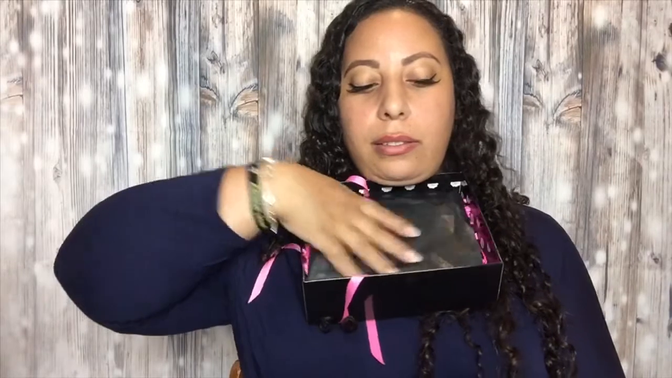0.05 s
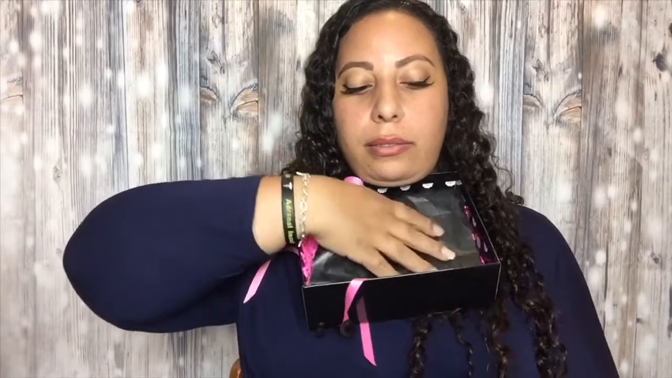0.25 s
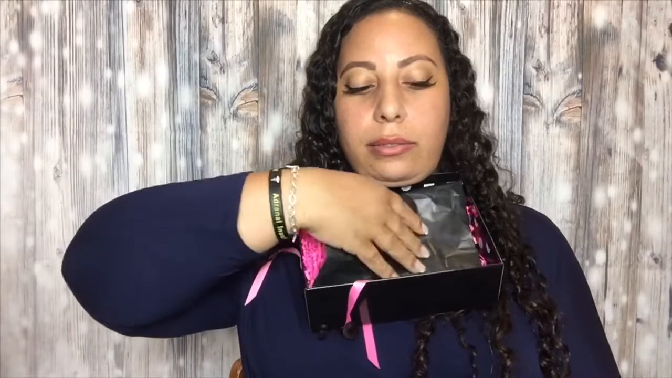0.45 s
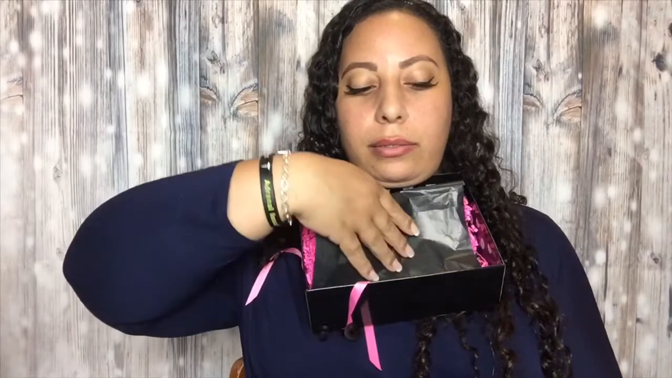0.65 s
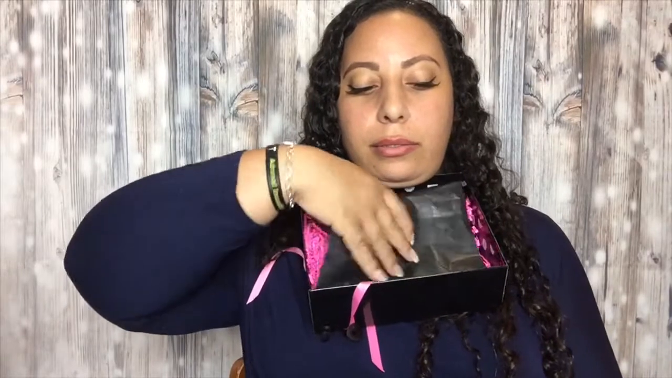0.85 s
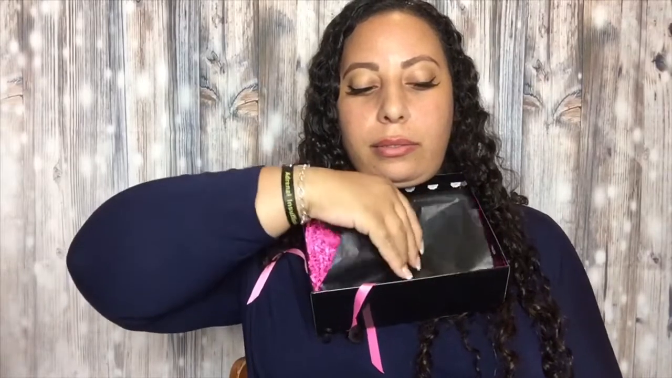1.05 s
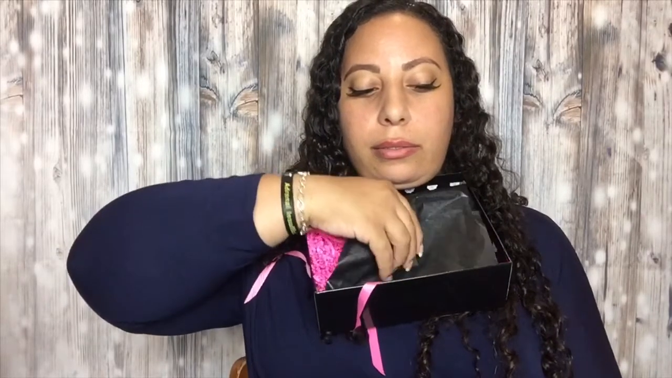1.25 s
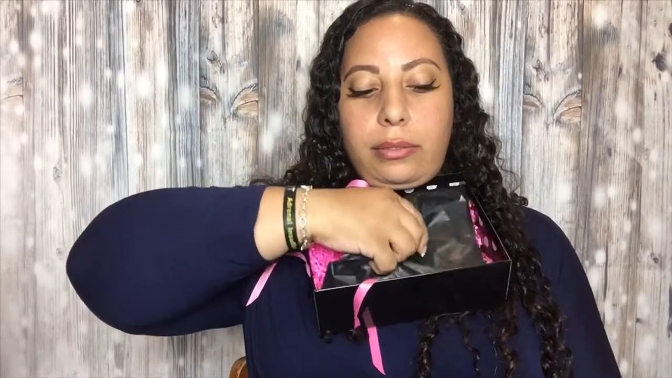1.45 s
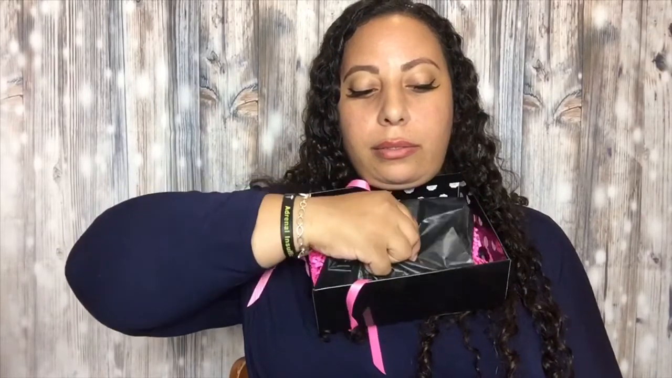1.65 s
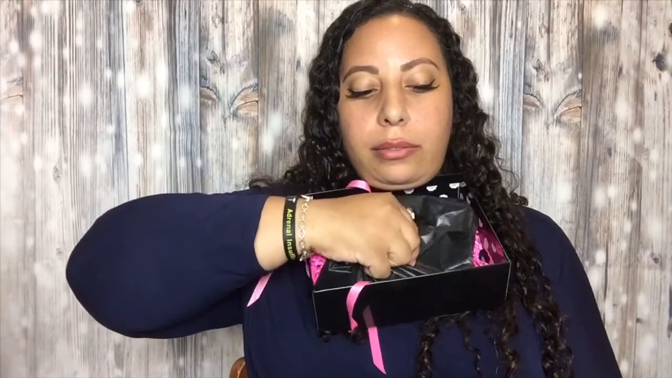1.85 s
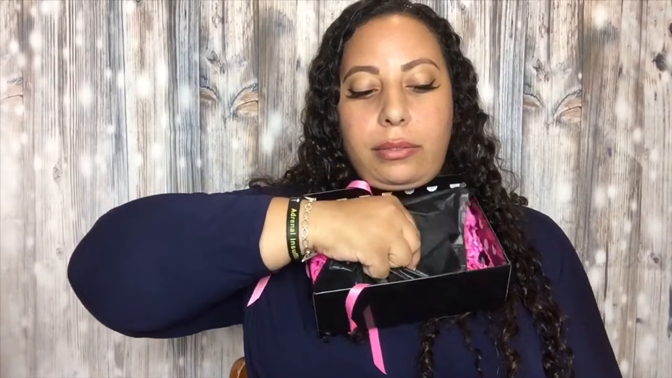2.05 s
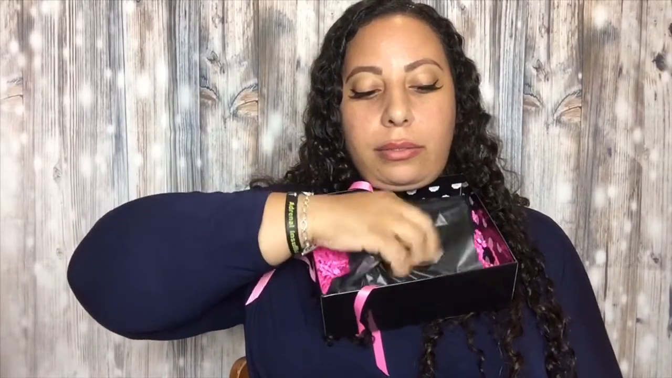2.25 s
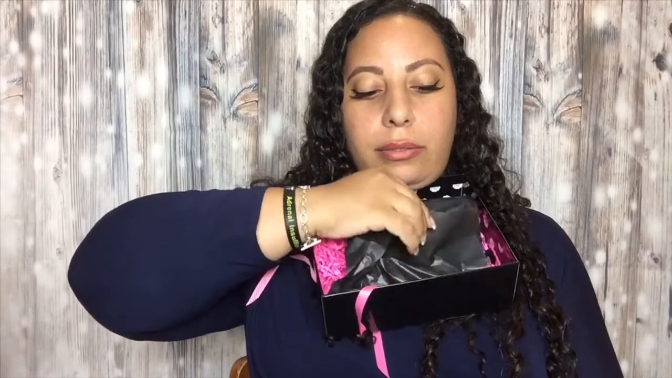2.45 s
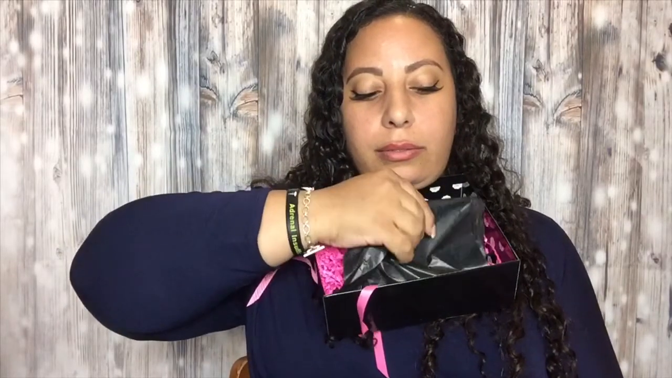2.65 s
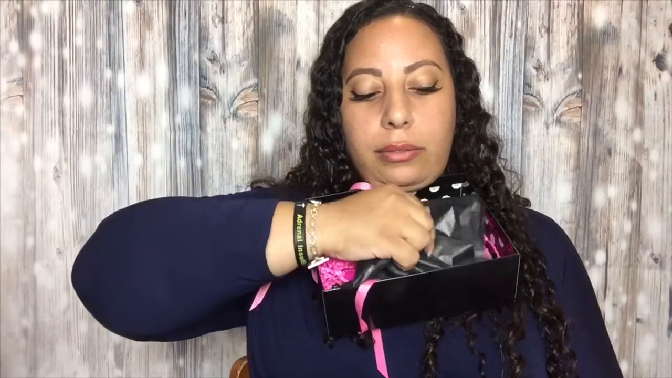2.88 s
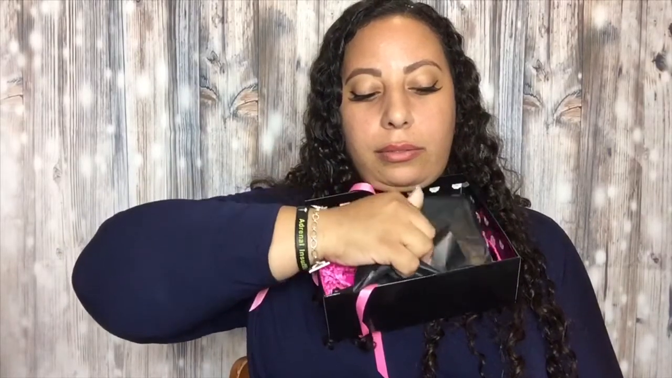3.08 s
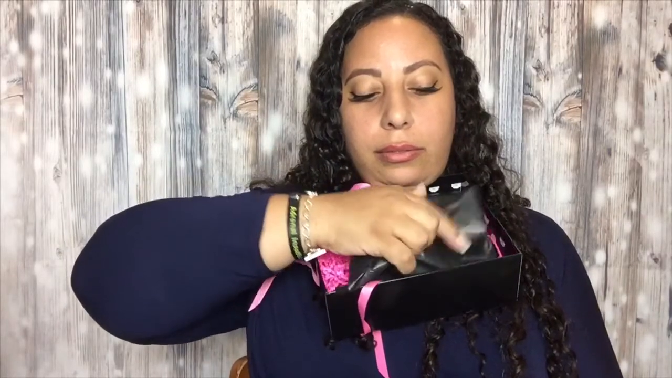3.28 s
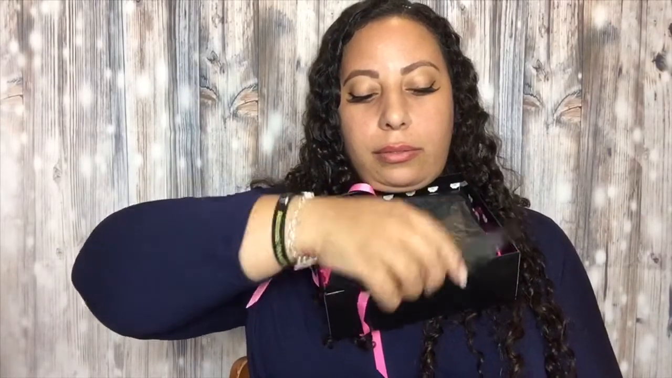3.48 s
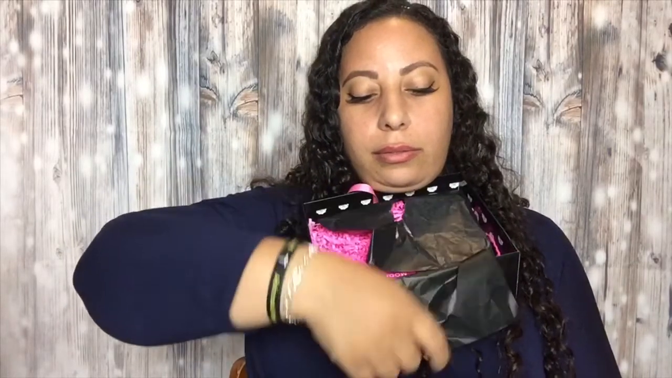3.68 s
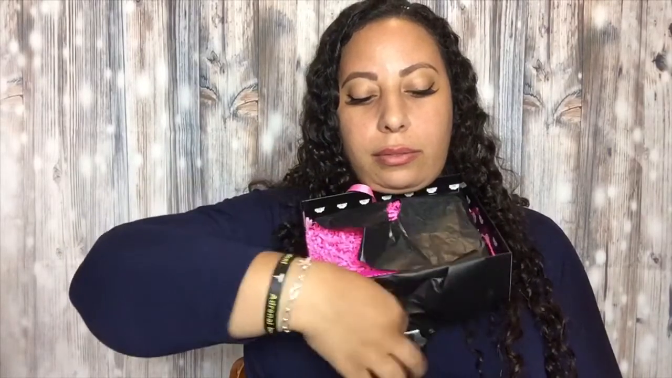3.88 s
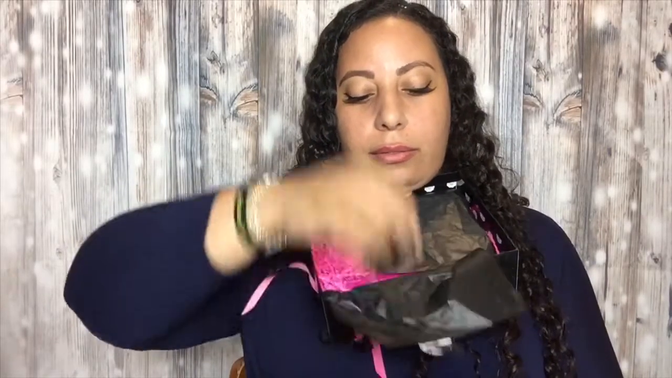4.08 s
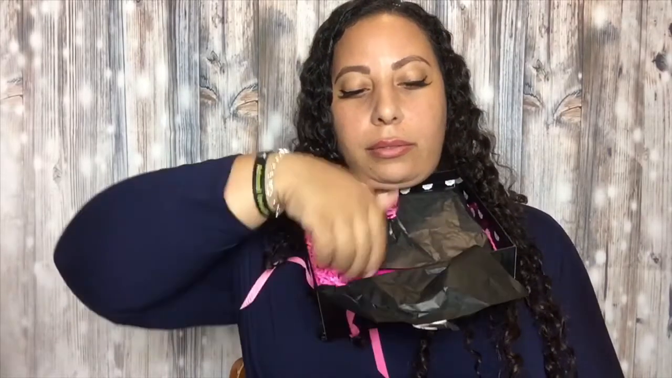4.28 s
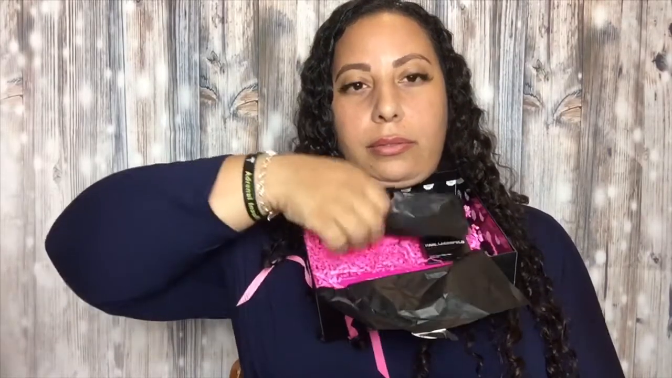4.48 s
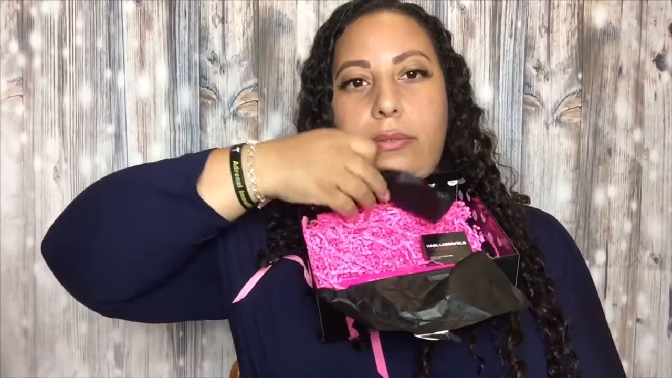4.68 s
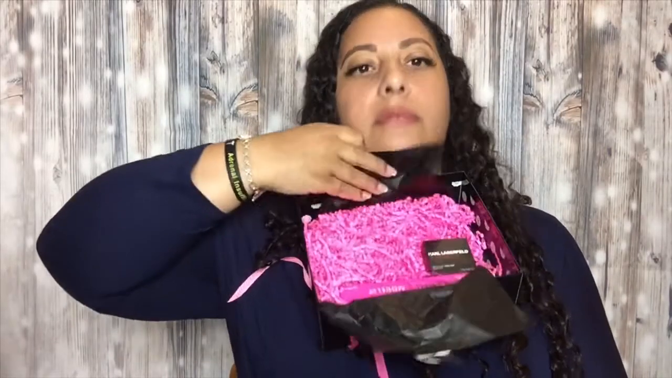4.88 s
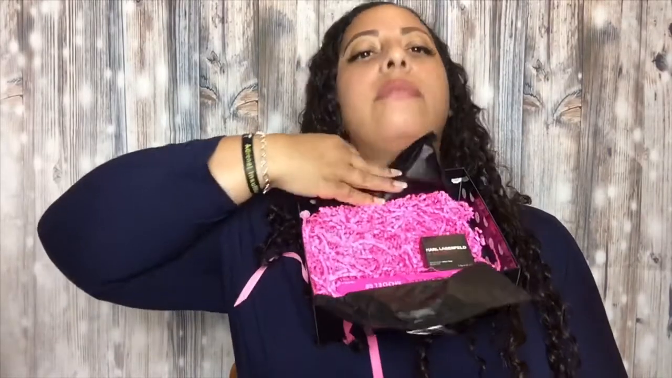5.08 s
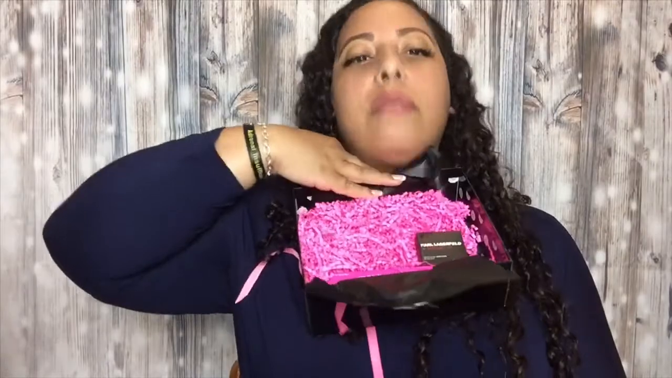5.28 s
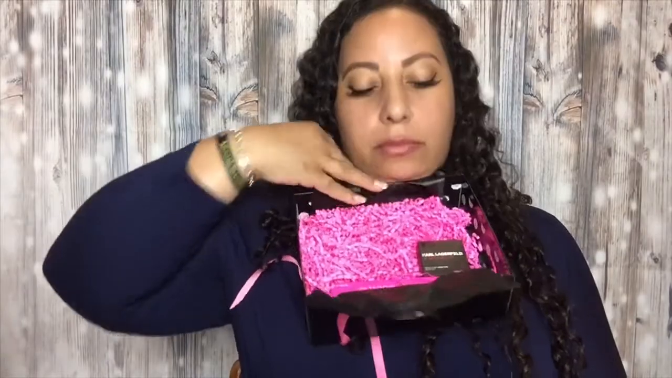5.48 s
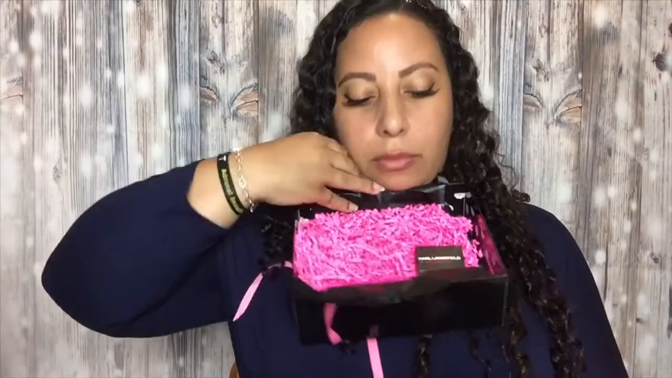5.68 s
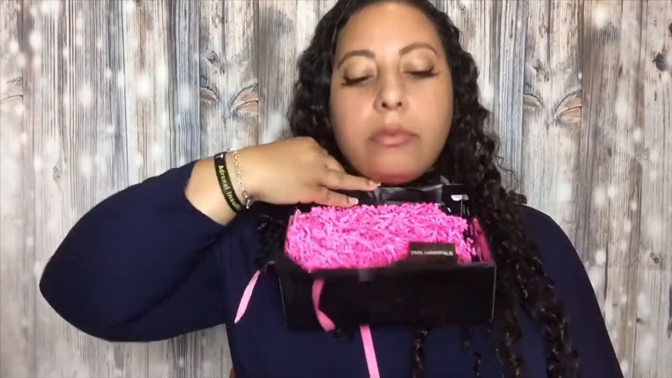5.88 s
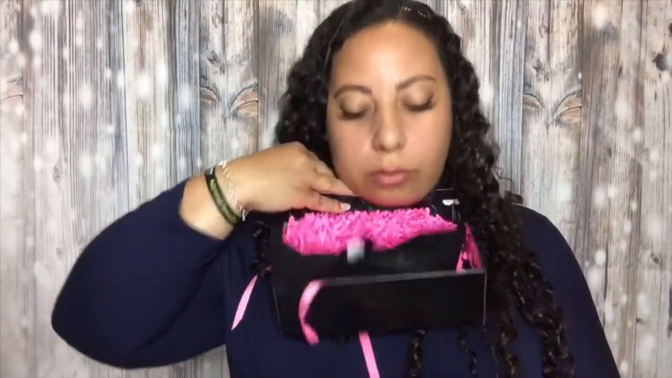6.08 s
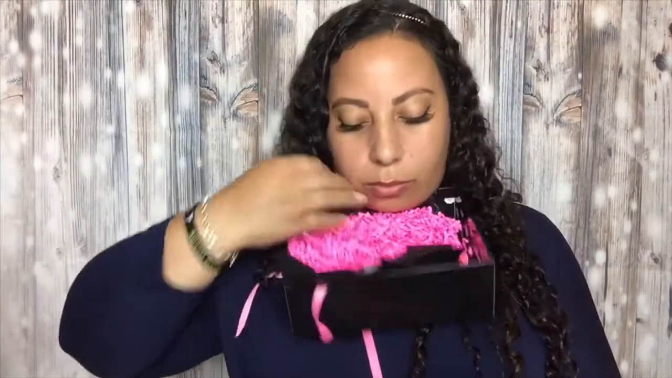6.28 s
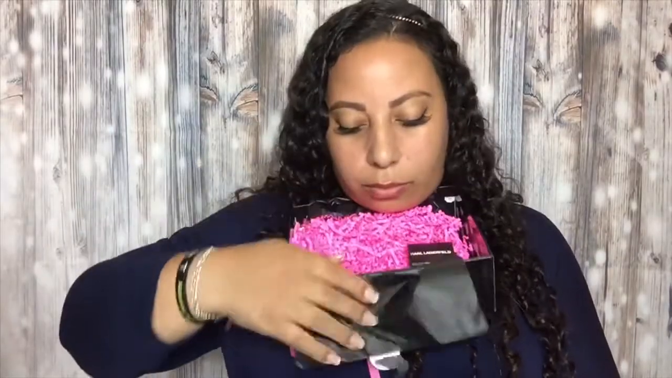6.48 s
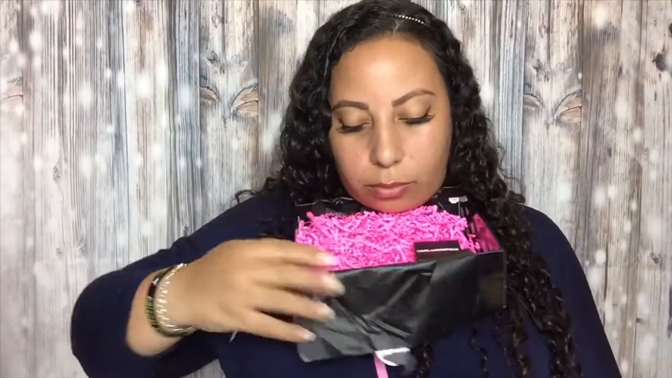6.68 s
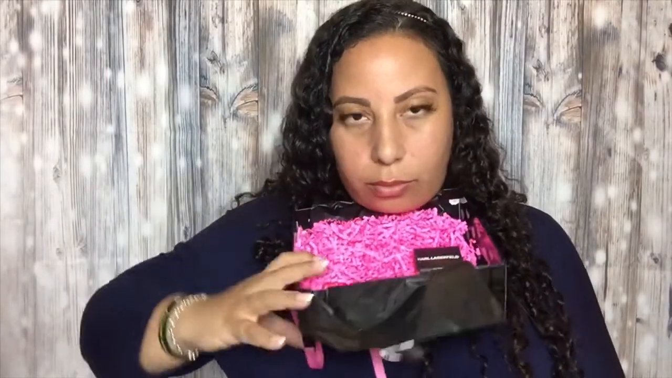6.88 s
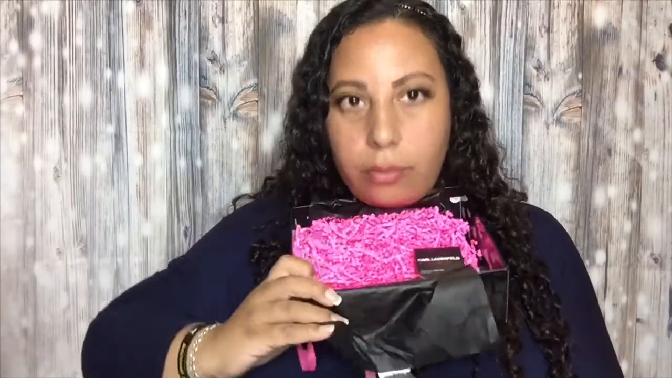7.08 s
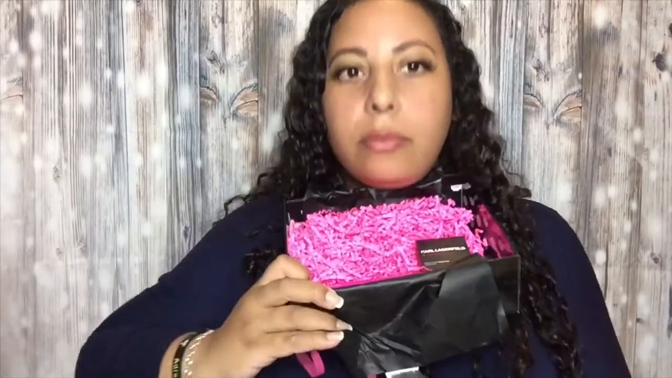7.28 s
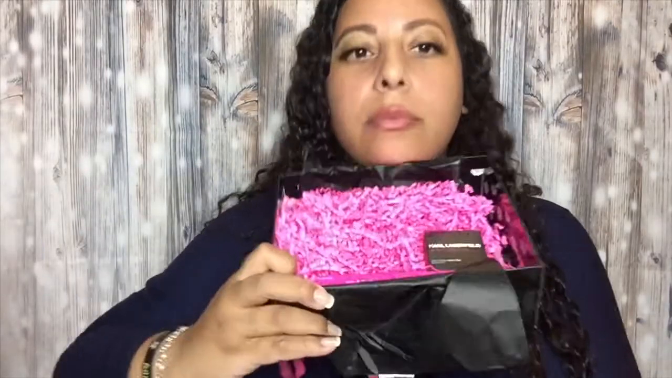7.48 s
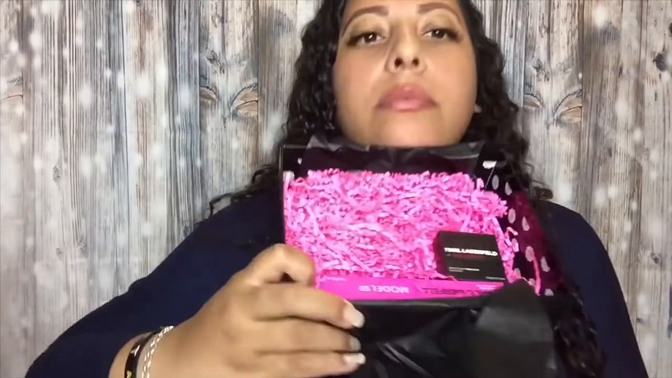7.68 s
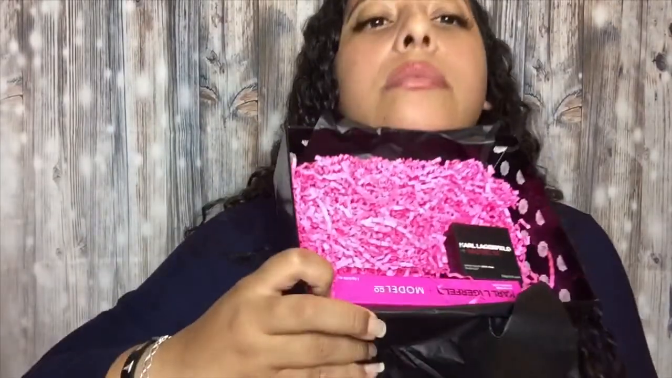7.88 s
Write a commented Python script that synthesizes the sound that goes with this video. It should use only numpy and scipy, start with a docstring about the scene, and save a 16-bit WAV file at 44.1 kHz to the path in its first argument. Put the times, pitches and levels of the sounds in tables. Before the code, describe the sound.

Thin tissue paper is handled inside a cardboard box, close to the microphone in a quiet room with faint steady air noise. From the start it rustles in uneven bursts, fine crackles and sharp crease snaps over a dry sliding hiss. The crinkling grows fuller from about 1.4 seconds, with a loud crunch just after 2 seconds and more crumpling around 2.7 to 3.1. The box adds a slight hollow ring and a few soft, damped knocks. The paper eases off and almost stops between 4.1 and 4.4 seconds. A light knock and a dense run of crisp crinkling follow, strongest from 4.9 to 5.4. Lighter crackles continue, with another sharp burst around 6.4 to 6.6. After a quieter stretch near 7 seconds, a few short rustles and a small tap on the box at 7.6 fade out by 8 seconds.

```python
"""In a quiet room, close to a microphone, a hand folds thin tissue paper back out of a cardboard box.
Creases buckle and release their elastic energy: large ones as short snaps, tiny ones as a swarm of
crackles over the friction hiss of the sliding sheet. Resonances of the box add a hollow ring, and
knocks on its walls give a few damped thuds. The paper's sound reflects briefly over steady air noise."""
import sys
import numpy as np
from scipy import signal
from scipy.fft import rfft, irfft
from scipy.io import wavfile
from scipy.ndimage import uniform_filter1d

SR = 44100
rng = np.random.default_rng(int(sys.argv[2]) if len(sys.argv) > 2 else 0)


def master(y):
    """Save y as 16-bit WAV."""
    cut = np.clip(np.atleast_2d(y).T, -1, 1)
    pcm = np.round(cut * 32767)  # scale
    wavfile.write(sys.argv[1], SR, pcm.astype(np.int16))


N = 350154

# Bands of the sheet's spectrum. Each row: lower edge in Hz, upper edge in Hz, group
# (0 paper body, 1 crisp edge, 2 box hollow, 3 box boom).
BANDS = [(120, 450, 3), (450, 1000, 2), (1000, 1800, 0), (1800, 3000, 0), (3000, 5000, 0), (5000, 8000, 1),
         (8000, 11000, 1), (11000, 17000, 1)]


def gain_of(db):
    """Amplitude ratio of a level in decibels; doubling the level gives the power ratio."""
    return 10 ** (np.asarray(db) / 20)


def unit_rms(x):
    """Normalisation to a root-mean-square value of 1."""
    return x / np.sqrt(np.mean(x ** 2) + 1e-20)


def curve_at(points, hz):
    """Interpolation along a logarithmic frequency axis."""
    f, value = np.transpose(points)
    return np.interp(np.log(hz + 1), np.log(f + 1), value)


def resonances_db(rows, hz):
    """Resonance peaks or dips as a sum of Lorentzian curves in decibels."""
    return sum(db / (1 + (2 * (hz - f) / width) ** 2) for f, width, db in rows)


def room_tone(level_db=-66):
    """Stationary noise of the room's air, strongest in the bass."""
    # Air spectrum. Each row: frequency in Hz, relative spectral density in dB.
    air = [(20, -35.5), (45, 1.5), (90, -12), (170, -5), (400, -12), (1300, -10), (2300, -12), (5000, -15),
           (16000, -29)]
    hz = np.fft.rfftfreq(N, 1 / SR)
    spectrum = rfft(rng.standard_normal(N)) * gain_of(curve_at(air, hz))
    return gain_of(level_db) * unit_rms(irfft(spectrum, N))


def paper_bands():
    """Source and filter: noise coloured by sheet and box, split into bands, with unit power per group."""
    # Spectrum of the sheet. Each row: frequency in Hz, relative spectral density in dB.
    sheet = [(88, -57), (150, -27), (264, -23.5), (334, -23.5), (457, -13.5), (637, 3.5), (888, -4.5),
             (1600, 0), (3770, 0), (4950, -1.5), (6770, -5.5), (10200, -9.5), (12200, -5), (14500, -10),
             (16000, -16)]
    # Modes of the box's air and walls. Each row: centre in Hz, width in Hz, gain in dB.
    box_modes = [(336, 27, 12.5), (500, 64, 6.5), (791, 19, 7), (1290, 26, 6)]
    hz = np.fft.rfftfreq(N, 1 / SR)
    spectrum = rfft(rng.standard_normal(N)) * gain_of(curve_at(sheet, hz) + resonances_db(box_modes, hz))
    bands = np.array([irfft(spectrum * ((hz >= lo) & (hz < hi)), N) for lo, hi, _ in BANDS])
    groups = np.array([group for *_, group in BANDS])
    power = (bands ** 2).mean(1)
    return bands / np.sqrt([power[groups == group].sum() for group in groups])[:, None]


def hand_effort(t):
    """Driving level in dB: the hand's touch and its crumples are incoherent, so their powers add."""
    # The hand rests and drags on the sheet. Each row: time in seconds, level in dB.
    touch = [(0, -42), (.9, -40), (1.3, -43), (1.6, -39), (2.35, -40), (2.5, -49), (2.7, -42.5),
             (3.12, -40.5), (3.2, -49.5), (3.42, -49), (3.7, -44), (4.0, -49.5), (4.2, -69.5), (4.38, -75),
             (4.44, -44.5), (5.0, -34.5), (5.2, -36), (5.28, -46), (5.6, -49.5), (5.8, -44), (6.2, -48.5),
             (6.36, -58), (6.5, -44), (6.78, -52), (6.84, -67.5), (7.29, -60), (7.35, -45), (7.7, -53.5),
             (7.94, -70.5)]
    # Fingers crumple the sheet. Each row: start in seconds, length in seconds, level in dB.
    crumples = [(0.055, 0.036, -41), (0.111, .055, -37), (0.182, 0.15, -35), (0.375, 0.053, -39),
                (0.49, 0.14, -42), (0.646, 0.022, -43.5), (0.7, 0.018, -44), (0.779, 0.018, -40),
                (0.971, 0.14, -35), (1.247, 0.018, -39), (1.344, 0.09, -35), (1.47, .23, -33),
                (1.764, 0.017, -37), (1.868, 0.059, -35), (2.054, 0.037, -22), (2.201, 0.13, -37.5),
                (2.417, 0.041, -41.5), (2.619, 0.013, -40.5), (2.734, 0.067, -32.5), (2.833, 0.041, -35),
                (2.936, 0.057, -31), (3.072, 0.012, -28), (3.125, 0.015, -35.5), (3.456, 0.18, -36),
                (3.818, 0.075, -40), (3.972, 0.053, -50), (4.1, 0.043, -60), (4.286, 0.044, -61),
                (4.405, .02, -45.5), (4.439, 0.068, -37), (4.653, 0.061, -40.5), (4.786, 0.14, -35.5),
                (5.0, 0.034, -35.5), (5.097, 0.048, -30.5), (5.348, 0.033, -36), (5.395, .12, -37.5),
                (5.641, 0.01, -41), (5.834, 0.024, -44.5), (6.121, 0.025, -41), (6.18, 0.023, -40),
                (6.42, 0.034, -30), (6.561, 0.036, -35), (6.846, 0.0069, -58.5), (7.081, 0.073, -43),
                (7.241, 0.025, -60), (7.414, 0.033, -44), (7.484, 0.025, -36.5), (7.588, 0.037, -49.5),
                (7.713, 0.093, -53)]
    rise_db_per_s, fall_db_per_s = 712.5, 371
    start, length, db = np.transpose(crumples)[:, :, None]
    coarse = t[::44]
    rise_db = rise_db_per_s * np.maximum(start - coarse, 0)
    fall_db = fall_db_per_s * np.maximum(coarse - start - length, 0)
    power = gain_of(2 * (db - rise_db - fall_db)).sum(0)
    power += gain_of(2 * np.interp(coarse, *np.transpose(touch)))
    return np.interp(t, coarse, 10 * np.log10(power))


def burst(t60, rise=0.03):
    """Power envelope of one crease, peak 1: exponential decay after a rise lasting a fraction of t60."""
    samples = max(t60, .002) * SR
    age = np.arange(int(samples)) / samples
    shape = (1 - np.exp(-(age / rise) ** 2)) * gain_of(-120 * age)
    return shape / shape.max()


def crackle_power(per_s=900, colour_db=7.0, clump_db=3.0, t60=0.018, slide=0.14):
    """Band powers of shot noise from tiny buckling creases, mixed with the hiss of sliding friction."""
    # How the sheet is held. Each row: time in seconds, then the levels of crisp edge, box hollow
    # and box boom in dB relative to the paper body.
    grip = [(0, -6, -11, -27), (1.06, -3, -9, -18.5), (2.0, -2.5, -7, -20.5), (2.6, -2, -10, -23.5),
            (2.85, -3, -9, -16), (3.55, -3, -10, -15.5), (3.95, -2, -14, -33), (4.24, -9, -15, -6),
            (4.5, -0.5, -9.5, -25), (4.8, -4.5, -16, -24.5), (5.4, -3, -17.5, -27), (5.9, -5, -20.5, -29),
            (6.4, -2, -11, -19.5), (6.7, -1.5, -16.5, -30), (7.0, -4.5, -13.5, -23),
            (7.4, -6.5, -17.5, -27), (7.9, -0.5, -9, -32)]
    t = np.arange(N) / SR
    grip_s, crisp_db, hollow_db, boom_db = np.transpose(grip)
    grip_db = (0 * grip_s, crisp_db, hollow_db, boom_db)
    effort_db = hand_effort(t)
    activity = np.clip(gain_of(.8 * (effort_db + 38)), .05, 1.5)  # a light touch: fewer creases
    onsets = np.flatnonzero(rng.random(N) < per_s / SR * activity)
    size_db = 4.0 * np.minimum(rng.exponential(1, N)[onsets], 3)
    colour = uniform_filter1d(rng.standard_normal((N, len(BANDS)))[onsets], size=2, axis=1)
    clumps = unit_rms(uniform_filter1d(rng.standard_normal(N), size=500))
    hiss_share = np.clip(slide * gain_of(0.38 * (effort_db + 33)), 0, .9)  # a firm hand slides more
    power = np.zeros((len(BANDS), N))
    for k, (lo, _, group) in enumerate(BANDS):
        power[k, onsets] = gain_of(2 * (size_db + colour_db * colour[:, k] + clump_db * clumps[onsets]))
        decay = burst(t60 * (0.53 + 800 / lo), rise=0.033)  # low bands ring longer
        grains = abs(signal.oaconvolve(power[k], decay)[:N])
        local_mean = uniform_filter1d(uniform_filter1d(grains, size=2600), size=2600)
        texture = hiss_share + (1 - hiss_share) * grains / abs(local_mean)
        level_db = effort_db + np.interp(t, grip_s, grip_db[group])  # the hand sets the energy spent
        power[k] = texture * gain_of(2 * level_db)
    return power


def snap_power(colour_db=2.5, crest_db=-13.5, focus_db=10.5, tilt_db=1.5, ring_s=0.0093, tick_s=0.0029):
    """Band powers of large creases buckling: a ring near the flap's pitch and a quick, bright tick."""
    # Snapping creases. Each row: start in seconds, level in dB, crisp edge in dB relative to
    # the paper body, flap pitch in Hz.
    snaps = [(0.0632, -5.5, -9, 3170), (0.1427, -3.5, -8, 2080), (0.258, -3.5, -11.5, 1520),
             (0.3206, -10.5, -5.5, 3080), (.411, -15.5, 1, 1420), (0.5425, -16, 0, 4610),
             (.585, -1.5, -9, 3670), (0.65, -5, -13, 2180), (0.7133, -6.5, -4.5, 1120),
             (0.781, -17, 7, 3500), (0.989, -23.5, 20.5, 3440), (1.027, -19, 11.5, 1650),
             (1.13, -12.5, 7.5, 3100), (1.2422, -7, -1, 3170), (1.3257, -12.5, -3, 2440),
             (1.35, -12.5, -1.5, 3960), (1.39, -7, 2.5, 1700), (1.49, -10, 4, 2450),
             (1.6927, 3.5, -9, 2760), (1.765, -14.5, -1, 2780), (1.868, -19, 5, 2450),
             (2.0048, -6.5, -14, 2100), (2.0441, -9, 1, 3160), (2.076, -4, 1.1, 2900),
             (2.4131, -17.5, 6.5, 3420), (2.4284, -14.5, 2, 1280), (2.5285, -26, 7, 2820),
             (2.552, -15, 2, 4420), (2.6216, -10.5, -2.5, 3430), (2.7664, -22, 6, 1210),
             (2.7871, -7.5, 7, 1850), (2.927, -9, 0, 1950), (3.0055, -13, 3, 1800),
             (3.0782, -6.5, -19, 2540), (3.2, -28, 6, 3500), (3.255, -23, 2, 2500), (3.2964, -20, -5, 2410),
             (3.663, -11.5, -5, 3970), (3.7027, -15.5, 3.5, 1620), (3.7685, -11.5, -4.5, 2160),
             (3.8412, -6.5, 0, 3240), (3.983, -15, 3, 2840), (4.07, -28, 2.5, 2870),
             (4.106, -25, -16, 3570), (4.301, -38, 14.5, 3440), (4.6055, -11.5, 2.5, 2000),
             (4.6967, -4, -10, 1600), (4.769, -7, -.6, 2020), (4.7912, -11.5, 8, 3220),
             (4.8678, -10, -3, 1950), (4.9016, -1.5, -6, 1350), (4.9873, -10.5, -3, 3680),
             (5.011, -3, -2.1, 2980), (5.09, -6, -15, 1620), (5.1091, 1.5, -7, 1590),
             (5.14, -1.5, -9, 1940), (5.1936, -7.5, -3, 2160), (5.224, -7, -0.5, 2390),
             (5.3082, -7, 1.5, 2180), (5.327, -6, -6, 3800), (5.3432, -2.5, -12, 1260),
             (5.3713, -6, 4.5, 3840), (5.4107, -4, 2.1, 2840), (5.4926, -11, -4, 4300),
             (5.564, -29.5, 6, 3000), (5.6083, -23, 0, 3940), (5.6481, -12.5, 1.5, 3500),
             (5.7055, -18, 5, 3540), (5.7332, -15.5, 8, 3470), (5.777, -21, -1, 3000),
             (5.8227, -21, 0, 2710), (5.844, -15, -1.1, 2960), (5.861, -21, 2, 3000), (5.91, -12, -4, 2880),
             (5.9608, -8, -4.5, 1290), (6.03, -19, -16, 2120), (6.0555, -15, -5, 2290),
             (6.0936, -15, 2, 2960), (6.116, -11.5, 0.5, 3950), (6.182, -11, -5, 3100),
             (6.1907, -20, 15.5, 4120), (6.207, -22, -2, 3500), (6.295, -28.5, 9, 3730),
             (6.4, -3, -5, 2200), (6.4036, -3.5, -2, 2060), (6.4487, -12.5, 3, 2640),
             (6.5121, -14.5, 7, 2700), (6.5747, -2, -3.5, 3270), (6.7152, -20, -6, 3360),
             (6.7422, -9, -37, 1220), (6.779, -33, -8, 4000), (6.79, -28, -1, 4000),
             (6.8518, -27, 0.5, 3520), (6.865, -22, -5, 3080), (6.933, -33, -8, 4000),
             (7.049, -26.5, -9, 2650), (7.0789, -16.5, 3.5, 3350), (7.1313, -32, 11.5, 2850),
             (7.2269, -22, -35, 2610), (7.24, -28, -20, 2000), (7.2567, -21.5, -8, 1560),
             (7.3839, -10, -8.5, 3080), (7.437, -18, -14, 3000), (7.4944, -15, 6.5, 4100),
             (7.5835, -8, -15, 4500), (7.748, -15.5, -17, 1440), (7.7634, -10.5, -2.5, 4150)]
    hollow_db, boom_db = -26.5, -40  # relative to the paper body
    power = np.zeros((len(BANDS), N))
    colour = rng.standard_normal((len(snaps), len(BANDS)))
    for (start, db, crisp_db, hz), tint in zip(snaps, colour):
        for k, (lo, hi, group) in enumerate(BANDS):
            body_db = -focus_db * np.log2(np.sqrt(lo * hi) / hz) ** 2
            edge_db = crisp_db + tilt_db * np.log2(lo / 8000)
            level_db = db + crest_db + (body_db, edge_db, hollow_db, boom_db)[group] + colour_db * tint[k]
            from_onset = power[k, max(round((start - .0005) * SR), 0):]
            ring = (ring_s * (0.8 + 1500 / lo), -1.5)  # low bands ring longer
            tick = (tick_s, 1.5 if group == 1 else -8.0)
            for t60, share_db in (ring, tick):
                shape = burst(t60)[:len(from_onset)]
                from_onset[:len(shape)] += gain_of(2 * (level_db + share_db)) * shape
    return power


def reflections(x, crossfade_hz=4.0):
    """Diffuse reverberation: four tails crossfade steadily, giving a short, even sound with no pitch."""
    # Decay of the room. Each row: frequency in Hz, reverberation time in seconds.
    decay_times = [(300, 0.1), (1000, 0.12), (3000, 0.057), (8000, 0.093), (16000, 0.031)]
    out = np.zeros(N)
    phase = 2 * np.pi * crossfade_hz * np.arange(N) / SR
    for k in range(4):
        hz, t, noise = signal.stft(rng.standard_normal(SR // 2), SR, nperseg=256)
        decay = gain_of(-60 * t / curve_at(decay_times, hz)[:, None])
        tail = signal.istft(noise * decay, SR, nperseg=256)[1]
        tail[:150] = 0  # the shortest reflected path is about a metre
        weight = np.maximum(np.cos(phase + k * np.pi / 2), 0)
        out += signal.fftconvolve(x * weight, tail / np.linalg.norm(tail))[:N]
    return out


def box_thuds(cycles=8.7, least_s=0.014, wobble_rad=0.39):
    """Damped vibration of the cardboard walls: each soft blow dies in a few cycles, its pitch wandering."""
    # The box is knocked or shifted. Each row: start in seconds, peak level in dB, pitch in Hz.
    knocks = [(1.079, -51, 60.7), (1.8, -55, 61.7), (2.26, -60, 63), (2.739, -38, 260), (2.786, -38.5, 194),
              (3.076, -46, 133), (3.531, -38, 306), (4.01, -49, 680), (4.495, -32.5, 687),
              (4.869, -47.5, 123), (5.21, -43.5, 195), (5.88, -50, 567), (6.41, -60, 55),
              (7.621, -35, 1014)]
    out, t = np.zeros(N + SR), np.arange(SR // 2) / SR
    for start, db, hz in knocks:
        t60 = least_s + cycles / hz
        shape = (1 - np.exp(-12 * t / t60)) * gain_of(-60 * t / t60)
        wander = unit_rms(uniform_filter1d(rng.standard_normal(len(t)), size=round(SR / hz)))
        ring = np.sin(2 * np.pi * hz * t + wobble_rad * wander)
        out[round(start * SR):][:len(t)] += gain_of(db) * shape / shape.max() * ring
    return out[:N]


def scene():
    """Superposition of the paper, its reflections, the box thuds and the room tone."""
    paper = (paper_bands() * np.sqrt(crackle_power() + snap_power())).sum(0)
    reverberation = gain_of(-11) * reflections(paper)
    return (paper + reverberation + box_thuds() + room_tone())[None]


def record(dry, bass_hz=36, limit_hz=16000):
    """Frequency response of the microphone: port notches, bass roll-off and a band limit."""
    # Dips of the microphone port. Each row: centre in Hz, width in Hz, gain in dB.
    notches = [(4950, 840, -5), (10400, 190, -4)]
    hz = np.fft.rfftfreq(N, 1 / SR)
    response = gain_of(resonances_db(notches, hz)) / (1 + (bass_hz / (hz + 1)) ** 6)
    coloured = irfft(rfft(dry) * response, N)
    low_pass = signal.firwin(511, limit_hz, window=("kaiser", 9), fs=SR)
    return signal.oaconvolve(coloured, low_pass[None], "same")


dry = scene()
out = record(dry)
master(out)
```